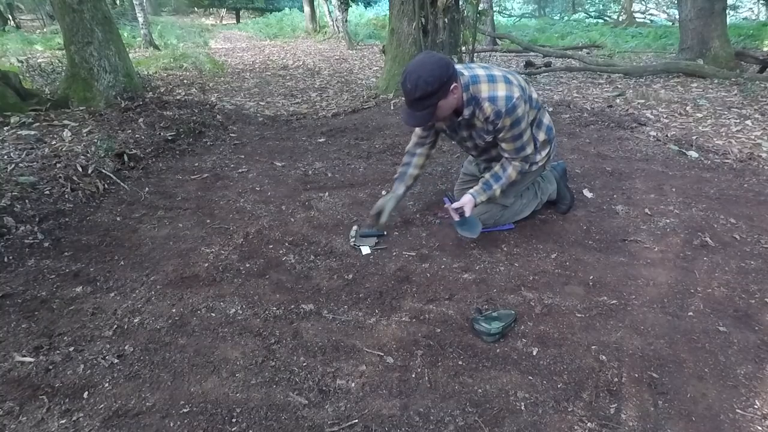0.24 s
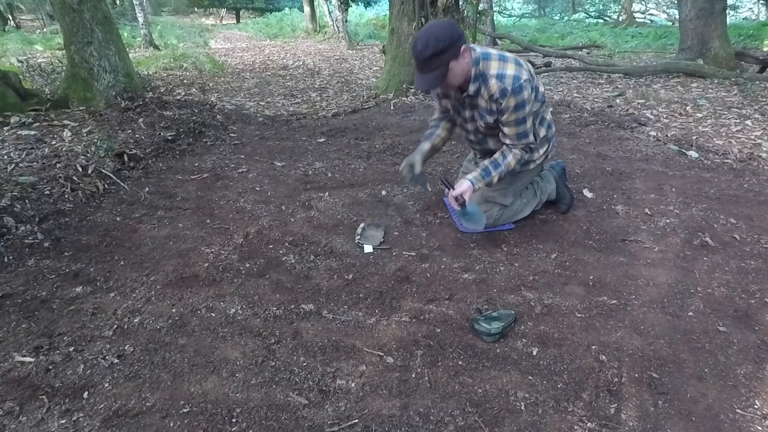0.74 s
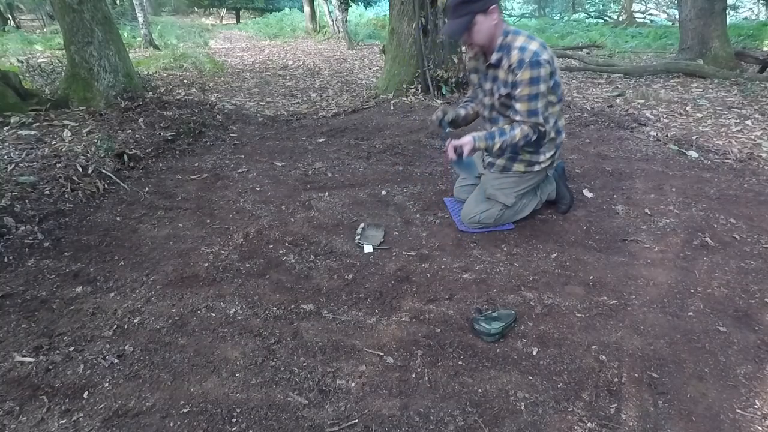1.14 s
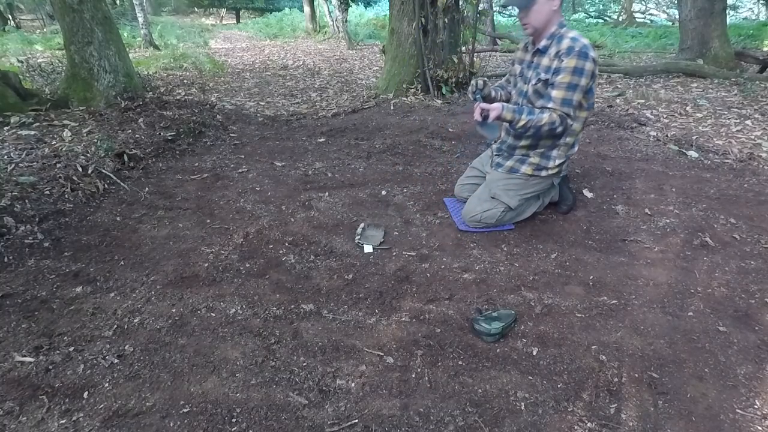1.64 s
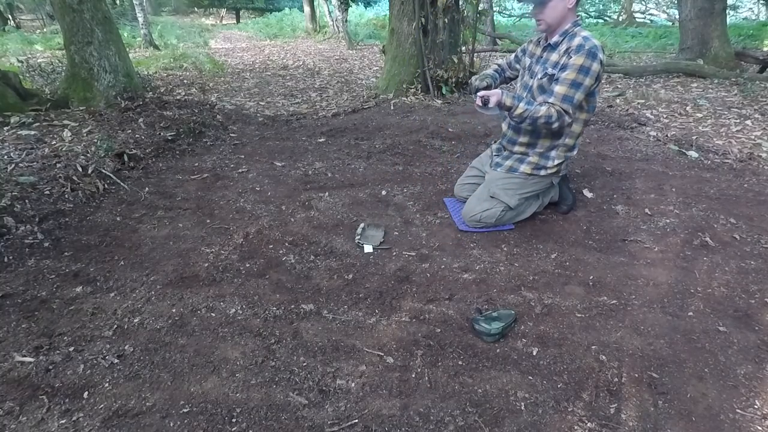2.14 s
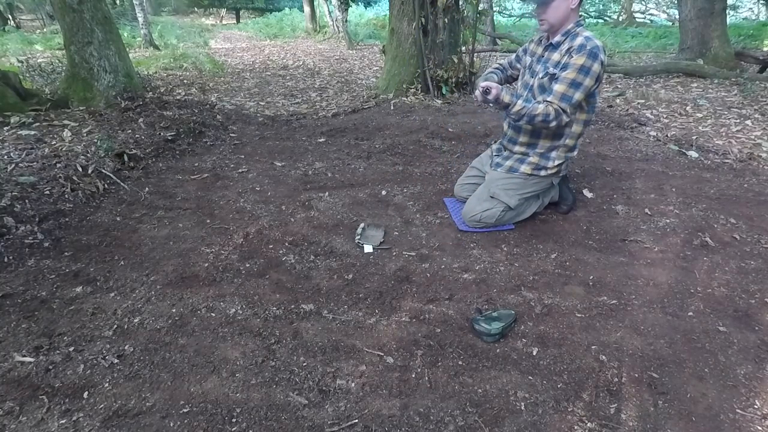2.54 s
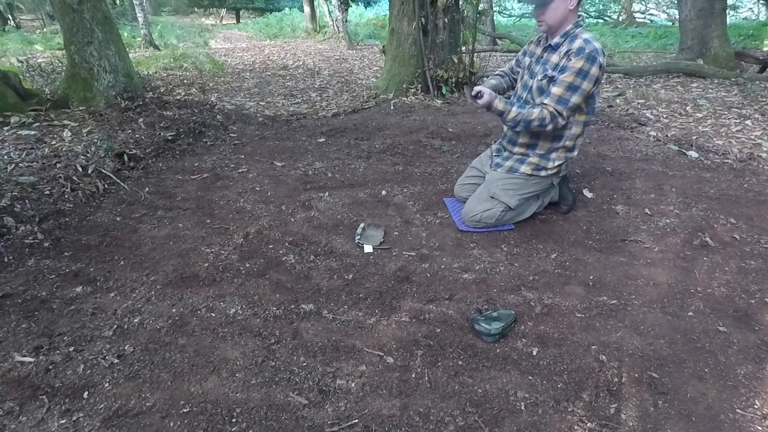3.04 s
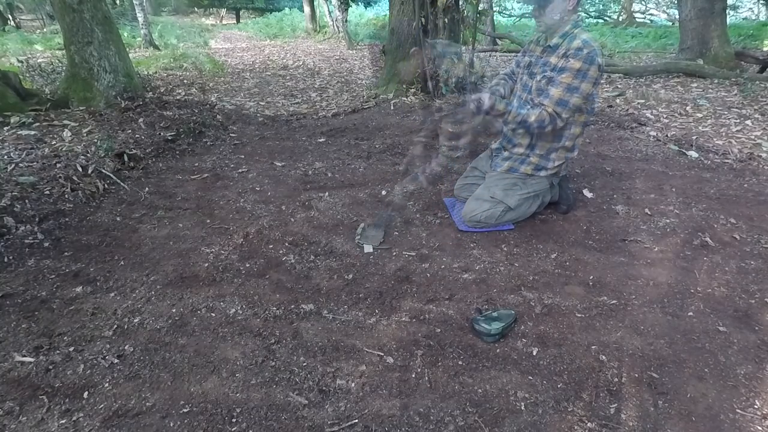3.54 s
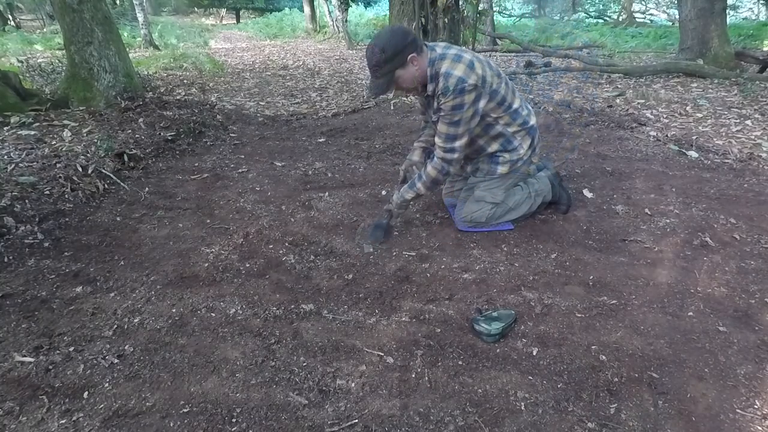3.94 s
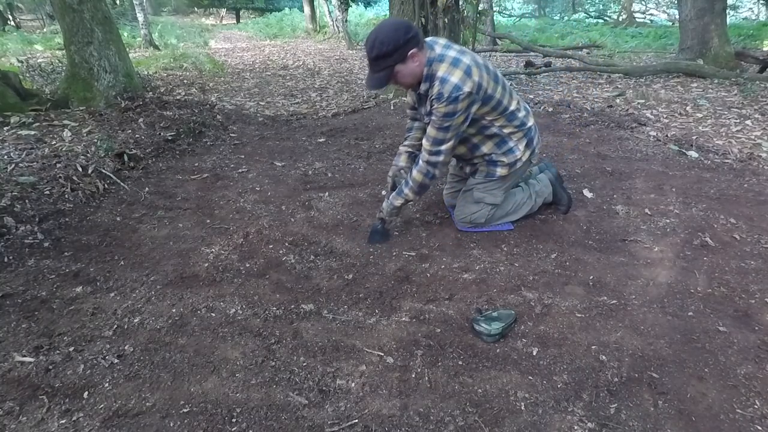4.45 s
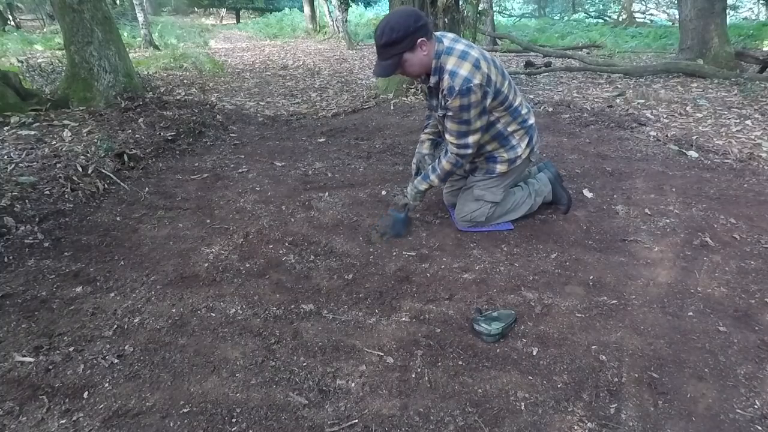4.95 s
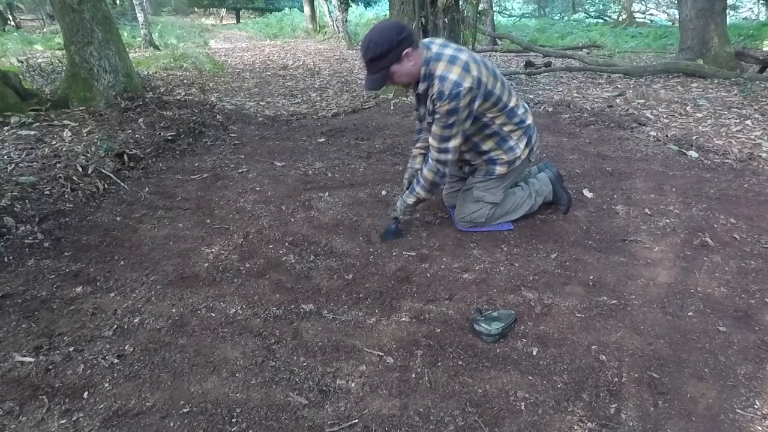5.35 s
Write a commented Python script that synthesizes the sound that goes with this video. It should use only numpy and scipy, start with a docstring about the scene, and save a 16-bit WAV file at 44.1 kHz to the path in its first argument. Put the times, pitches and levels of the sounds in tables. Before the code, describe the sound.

Outdoors on a woodland floor, a few metres from the microphone, a trowel blade gives small bright ticks. A thin steel pan then ticks and clanks, sharpest near one and a half seconds. Blade taps follow, and from about four seconds gritty strokes dig through dry soil and leaf crumbs, with twigs and stones snapping. Low rumble and soft hiss lie beneath, with a faint short echo.

```python
"""On the bare floor of a wood, over a low outdoor rumble and soft hiss, a trowel blade ticks a few metres away.
After a light brush of the litter a small steel pan ticks and clanks: chattering contacts drive its ringing modes.
The blade then taps and is drawn through dry soil and leaf crumbs in gritty strokes made of random breaks.
Later twigs and small stones snap under it, as short noise bursts with a crumbling tail.
From the first tick on, the ground, the kneeling body and the trees return a faint echo of decaying noise."""
import sys
import numpy as np
from scipy import signal
from scipy.fft import rfft, irfft, next_fast_len
from scipy.io import wavfile

SR = 44100
rng = np.random.default_rng(int(sys.argv[2]) if len(sys.argv) > 2 else 0)


def output_pcm(signal):
    """Save a mono or channel-first signal as 16-bit PCM at the path in sys.argv[1].

    Samples are clipped to [-1, 1] before scaling.
    """
    pcm = np.clip(np.atleast_2d(signal).T, -1, 1) * 32767
    wavfile.write(sys.argv[1], SR, np.round(pcm).astype(np.int16))


N = 246519

# Spectrum of the outdoor rumble: (frequency [Hz], relative level [dB])
RUMBLE_SPECTRUM = [(13, -37), (22, -4), (82, 0.5), (99, -1.5), (140, -8), (184, -6.5), (221, -14),
                   (336, -19.5), (420, -29), (550, -56), (920, -120)]
# Swell of the rumble's upper part, before a fixed trim: (time [s], level [dB])
RUMBLE_SWELL = [(0.0, -39.5), (0.15, -41), (0.43, -44.5), (1.2, -36), (1.62, -39.5), (1.82, -36),
                (2.12, -42.5), (3.3, -42.5), (3.38, -44.5), (4.95, -44.5), (5.43, -42.5), (5.59, -42.5)]
# Spectrum of the soft hiss: (frequency [Hz], relative level [dB])
HISS_SPECTRUM = [(180, -10.5), (300, 0), (511, -6), (614, -9), (842, -9), (978, -12), (2440, -15),
                 (2880, -17), (3240, -16.5), (4520, -18), (5430, -19), (14700, -23.5), (16000, -28)]
# Body, mid, upper and top bands of every contact: (low edge [Hz], high edge [Hz])
BANDS_HZ = [(380, 1200), (1200, 3000), (3000, 6500), (6500, 15500)]
# Broad colour of dry contacts: (centre [Hz], width [Hz], boost or dip [dB])
CONTACT_COLOUR = [(1900, 1300, 19), (4060, 4300, 11.5), (8560, 2100, 12), (9800, 1200, -4.5),
                  (13300, 7800, 6)]
# In the event tables level is that of the mid band, before the layer's gain;
# body, brightness and top sparkle are relative to it.
# Taps and short rasps of the blade: (time [s], level [dB], body [dB], brightness [dB], top sparkle [dB],
# contact [s], ring trim [dB], frequency favoured by the struck spot [Hz])
BLADE_TAPS = [(.078, -39, -9, 11.5, 3, 0.0016, 1, 4010), (.332, -42.5, -14, 14, 7, 0.0033, 5, 8395),
              (.34, -39, -17, 5, 2, 0.012, -14, 7730), (.4046, -42, -16, 4, -2, 0.0036, 7, 5658),
              (2.5203, -31.5, -9, 1.5, -3, .0038, -26, 2230), (2.529, -31, -6, 1, -9, 0.0058, 3, 2230),
              (2.5647, -49.5, -17, 11.5, 7, 0.0052, -24, 4320),
              (2.8945, -32.5, -1, -3, -5.5, 0.0092, -17, 2615),
              (2.8999, -30, -11, -1, -25, 0.00044, -13.5, 870),
              (3.0057, -34, -6, -5.5, -8.5, 0.0051, -12, 2615),
              (3.095, -38.5, -14, -4.5, -15, 0.0082, -31, 2615),
              (3.2375, -34, -8, -1, -1.5, 0.0046, -10, 8807), (3.243, -39, -34, -18, -9, 0.0019, 18, 2615),
              (3.297, -44.5, -10, 1, 3.5, 0.0093, -31, 8395), (3.312, -41, -1, 1.5, -10, 0.0035, -9, 3450),
              (3.4407, -43, -13, -8, -21, 0.018, -37, 2230),
              (3.9905, -38.5, -24, -0.5, -2, 0.0036, -42, 2230),
              (5.4195, -27, -6, -2, -7, 0.021, -31, 2615), (5.4415, -30.5, -27, 0, 3, 0.0056, -8, 3450),
              (5.469, -25, -21, -16, -9, 0.0033, -8, 2615), (5.475, -29.5, -15, 3, -3, 0.0037, -7, 6383)]
# Modes of the free blade: (frequency [Hz], strength [dB], undamped t60 [s])
BLADE_MODES = [(870, -5.5, 0.089), (1310, -37, 0.017), (1620, 6.5, 0.049), (1716, -6, 0.19),
               (2070, -42, 0.078), (2230, 12, 0.021), (2615, -7, 0.33), (2720, 6.5, 0.039),
               (3450, 4, 0.0099), (4010, 6, 0.017), (4320, -17, 0.18), (4590, -7, 0.18), (5160, -4, 0.083),
               (5658, -25, 0.18), (5900, -9, 0.11), (6383, -20, 0.25), (7120, 0.5, 0.047), (7730, 5, 0.041),
               (8010, -15, 0.066), (8395, 2.5, 0.056), (8807, -10, 0.21), (9800, 0.5, 0.066)]
# Strokes through the litter, light brushes at first, then digging:
# (start [s], push [s], ease-off [s], peak level [dB], body [dB], brightness [dB])
STROKES = [(.61, 0.057, .05, -55, -10, -4), (2.47, .03, 0.25, -56, -5, -4.5),
           (2.86, 0.022, 0.069, -49.5, -12, -1.5), (3.205, 0.029, .02, -51, -11, 0),
           (3.661, 0.017, 0.06, -54.5, -14, -2.5), (3.86, 0.1, 0.0092, -56, -14, 0.5),
           (4.09, 0.057, 0.12, -50.5, -4.5, -5), (4.194, 0.049, 0.15, -34.5, -7.5, -3),
           (4.428, 0.11, 0.14, -46, -2.5, -2), (4.752, 0.0085, .12, -50.5, -1, 2.5),
           (4.9, .025, 0.038, -55, -7, 1), (5.01, 0.0088, 0.053, -46, -6, -1),
           (5.073, 0.056, 0.12, -29.5, -4, -4.5), (5.3, 0.038, 0.039, -47.5, -1.5, -4.5),
           (5.375, 0.093, 0.044, -39.5, -7.5, -1.5), (5.495, 0.017, 0.15, -48.5, 0.5, 0.5)]
# Knocks on the pan: (time [s], level [dB], body [dB], brightness [dB], top sparkle [dB],
# contact [s], ring trim [dB], frequency favoured by the struck spot [Hz])
PAN_KNOCKS = [(1.0376, -46, 9, 10, 0.5, 0.0023, -9, 2502), (1.047, -38.5, -3, -16, -25, 0.0014, -2, 2502),
              (1.1675, -38, -2.5, -12, -22, 0.0051, -6, 1830),
              (1.217, -45, 0.5, -7, -11, 0.0061, -11, 4640), (1.228, -49, -6, 9, -10, 0.0028, 10, 5740),
              (1.2737, -36.5, .5, -5, -19, 0.0043, -7, 1503),
              (1.443, -29.5, -7.5, -6, -14, 0.0066, -1, 1503), (1.452, -35, -18, 3, -7, 0.0091, -22, 5740),
              (1.459, -17.5, -24, 8.5, 0.5, 0.0074, 0, 6180), (1.469, -21, -24, 4.5, 1, 0.00097, -8, 2502),
              (1.6877, -51.5, 2, 2.5, -4, 0.007, -16, 3892), (1.7695, -50.5, -15, 9, -1, 0.0066, -14, 3195),
              (1.9067, -52, -6, 2.5, -9, .0052, -15, 3765),
              (2.0364, -44.5, -6, -12, -17, 0.0053, -23, 1830),
              (2.0718, -35, -13, -5, -11.5, 0.0056, -13, 1503),
              (2.194, -36, -7, -9.5, -33, 0.0018, -15, 1503)]
# Modes of the free pan: (frequency [Hz], strength [dB], undamped t60 [s])
PAN_MODES = [(620, 2, .15), (1503, 2, .13), (2497, -7, .38), (5740, -1, .17), (1830, -8, .03),
             (1925, -15, .16), (2029, -4, .04), (3195, 0, .045), (3765, -5, .05), (3892, -14, .12),
             (3990, -3, .04), (4640, -8, .07), (5058, -2, .04), (5233, -15, .14), (5930, -10, .12),
             (6040, -21, .25), (6150, -19, .22), (6385, -16, .22), (6972, -5, .1), (7705, -4, .07),
             (8484, -9, .1)]
# Twigs and stones giving way: (time [s], level [dB], body [dB], brightness [dB])
SNAPS = [(3.685, -52.5, -14, 3), (3.749, -52, 6.5, 0.5), (4.0997, -39, -10, 0.5), (4.121, -42, -15, -3),
         (4.1373, -45, -11, 1), (4.1582, -43, -1, -1), (4.207, -35.5, -7, -0.5), (4.225, -28, -2, -20),
         (4.24, -28, -12, -5.5), (4.274, -31, -23, -6), (4.979, -46, -3, 2.5), (5.011, -42.5, 5.5, -8),
         (5.14, -29, 4, -21), (5.1534, -24.5, -1, 4.5), (5.193, -29.5, 2, -28), (5.294, -41, -1.5, -7),
         (5.3003, -40.5, -14, 1), (5.348, -42.5, -2, -2), (5.3687, -38.5, -13, 12.5), (5.378, -35, -5, -16)]

DEEP_DB, DEEP_EDGE_HZ = -44, 51   # the rumble's deepest part stays steady
UPPER_TRIM_DB, HISS_DB = 1.44, -49
TOUCH_S, LIFT_S = 0.021, 0.0069   # the blade meets and leaves the ground
LIGHT_TOUCH_DB = -73   # a blade that barely rests on the litter
STROKE_SWELL, STROKE_SAG = 0.21, 0.44   # share of the dB between light touch and peak that it rises, then falls
STROKE_ROUNDING = 1.32   # above 1 the pressure lingers near its peak
CUTOFF_HZ = 15350


def from_db(db):
    """Decibels to gain."""
    return 10 ** (np.asarray(db) / 20)


def rms_one(x):
    """Scale to rms 1."""
    return x / np.sqrt(np.mean(x ** 2) + 1e-20)


def add(track, s, sound):
    """Mix a sound in at s seconds."""
    start = round(s * SR)
    track[start:start + len(sound)] += sound[:N - start]


def band(x, edges_hz, order=3):
    """Causal band-pass."""
    return signal.sosfilt(signal.butter(order, edges_hz, "band", fs=SR, output="sos"), x + 1e-18)


def steady_noise(spectrum):
    """Noise of a given spectrum, rms 1."""
    hz, db = np.transpose(spectrum)
    size = next_fast_len(N)
    log_hz = np.log(np.fft.rfftfreq(size, 1 / SR) + 1e-3)
    gain = from_db(np.interp(log_hz, np.log(hz), db, left=-200, right=-200))
    return rms_one(irfft(rfft(rng.standard_normal(size)) * gain, size)[:N])


def rumble_part(side):
    """Rumble noise on one side ("low" or "high") of the deep edge, rms 1."""
    split = signal.butter(4, DEEP_EDGE_HZ, side, fs=SR, output="sos")
    return rms_one(signal.sosfilt(split, steady_noise(RUMBLE_SPECTRUM)))


def outdoors():
    """A steady deep rumble, a swelling layer just above it, and a soft hiss, each of shaped noise."""
    time_s, swell_db = np.transpose(RUMBLE_SWELL)
    upper_db = np.interp(np.arange(N) / SR, time_s, swell_db) + UPPER_TRIM_DB
    rumble = from_db(DEEP_DB) * rumble_part("low") + from_db(upper_db) * rumble_part("high")
    return rumble + from_db(HISS_DB) * steady_noise(HISS_SPECTRUM)


def coloured(x):
    """The broad peaks and dips of a dry contact, in series."""
    for hz, width_hz, db in CONTACT_COLOUR:
        w, g = 2 * np.pi * hz / SR, from_db(db / 2)
        a = np.tan(np.pi * width_hz / SR)
        zeros = [1 + a * g, -2 * np.cos(w), 1 - a * g]
        poles = [1 + a / g, -2 * np.cos(w), 1 - a / g]
        x = signal.lfilter(zeros, poles, x)
    return x


def band_gains(level_db, body_db, bright_db, top_db):
    """Gains of the low, mid, upper and top bands; body, brightness and top are relative to the mid band."""
    return [from_db(level_db + db) for db in (body_db, 0, bright_db, top_db)]


def voiced(sound, gains):
    """Hardness and place of a contact set each band's energy in its first 30 ms (as if spread over 10 ms)."""
    head, spread = round(.03 * SR), .01 * SR
    voice = 0
    for gain, edges in zip(gains, BANDS_HZ):
        part = band(sound, edges)
        voice = voice + gain * part * np.sqrt(spread / np.sum(part[:head] ** 2))
    return voice


def ring(force, hz, t60):
    """One mode: a unit click leaves a dying sine of height 1."""
    r, w = from_db(-60 / (t60 * SR)), 2 * np.pi * hz / SR
    return signal.lfilter([0, np.sin(w)], [1, -2 * r * np.cos(w), r * r], force + 1e-18)


def strikes(events, modes, ring_db, spot_db, spot_octaves, release, damping_db):
    """Steel chatters for a few ms and drives the modes, most of all those that swing at the struck spot."""
    out, t = np.zeros(N), np.arange(SR // 2) / SR
    hz, mode_db, t60 = np.transpose(modes)
    for s, level_db, *tone_db, contact_s, own_ring_db, spot_hz in events:
        chatter = rng.standard_normal(len(t)) * from_db(2 * rng.standard_normal(len(t)))
        age = t / max(contact_s, 1e-4)
        envelope = (1 - np.exp(-12 * age)) * np.exp(-age ** release)   # a long rasp also starts more softly
        chatter = coloured(chatter * envelope)

        favoured = np.exp(-(np.log2(hz / spot_hz) / spot_octaves) ** 2)
        strength_db = mode_db + spot_db * favoured + rng.standard_normal(len(hz))
        strengths = from_db(strength_db) * np.sqrt(t60)
        # a heavy blow presses the parts together and chokes the ring
        lives = t60 / (1 + from_db(level_db - damping_db))
        steel = sum(g * rms_one(ring(chatter, f, life)) for g, f, life in zip(strengths, hz, lives))

        contact = rms_one(chatter) + from_db(ring_db + own_ring_db) * rms_one(steel)
        add(out, s, voiced(contact, band_gains(level_db, *tone_db)))
    return out


def blade_taps():
    """Taps and short rasps of the trowel blade, ringing in its own modes."""
    return strikes(BLADE_TAPS, BLADE_MODES, ring_db=7.0, spot_db=17.5, spot_octaves=0.035,
                   release=0.99, damping_db=-24)


def wood_echo(x, t60, top_hz, near_t60, near_db):
    """Ground and kneeling body scatter the sound within ms; the trunks send back a thin, duller tail."""
    t = np.arange(SR) / SR
    trunks = from_db(-60 * t / t60)
    near = from_db(near_db - 60 * t / near_t60)
    tail = rng.standard_normal(SR) * (trunks + near) * (t > .004)
    echoes = band(tail, [500, top_hz], order=2)
    return signal.fftconvolve(x, echoes / np.sqrt(np.sum(echoes ** 2)))[:N]


def drift(rate):
    """Smooth chance with spread 1 and about `rate` turns a second."""
    knots = rng.standard_normal(8192)
    return rms_one(np.interp(np.arange(N) / SR * rate, np.arange(len(knots)), knots))


def breaks(per_s, size_db):
    """Random clicks, scaled to be equally strong on average at any rate; size_db sets how sizes vary."""
    sizes = from_db(size_db * np.minimum(rng.exponential(1, N), 3)) * rng.choice([-1, 1], N)
    happens = rng.random(N) < per_s / SR
    return rms_one(happens * sizes / np.sqrt(per_s))


def crumbs(per_s, count=42):
    """Coarse bits of leaf and grit tick at own pitches; alike bits lie in clumps, so each pitch comes and goes."""
    cycles, clumps_per_s, clump_db = 30, 28, 3.8   # a tick's t60 lasts this many cycles
    clicks, dealt = breaks(per_s, size_db=6.5), rng.integers(0, count, N)
    ticks = np.zeros(N)
    for k, hz in enumerate(np.geomspace(430, 13000, count)):
        clumping = from_db(clump_db * drift(clumps_per_s))
        ticks += ring(clicks * (dealt == k), hz, cycles / hz) * np.sqrt(hz) * clumping
    return rms_one(coloured(ticks))


def stroke_gains(top_db, top_follows):
    """Band gains as strokes touch down, swell, sag and lift off: light brushes stay even, hard digs peak."""
    power, t = np.zeros((len(BANDS_HZ), N)), np.arange(N) / SR
    for start, push_s, ease_s, peak_db, body_db, bright_db in STROKES:
        peak, end = start + push_s, start + push_s + ease_s
        slack = np.interp(t, [start, peak, end], [1, 0, 1]) ** STROKE_ROUNDING
        slack = slack * np.where(t < peak, STROKE_SWELL, STROKE_SAG)
        pressure = from_db(slack * (LIGHT_TOUCH_DB - peak_db))
        touching = np.interp(t, [start - TOUCH_S, start, end, end + LIFT_S], [0, 1, 1, 0])
        # the top follows the brightness
        gains = band_gains(peak_db, body_db, bright_db, top_db + top_follows * bright_db)
        power += np.outer(gains, pressure * touching) ** 2
    return np.sqrt(power)


def scrape(grains_per_s, crumbs_per_s, slip_rate, slip_db, blade_db, thud_db, cracks_per_s, crack_db):
    """Soil breaks in clumps as the blade sticks and slips; harder strokes break more, and the steel rings faintly."""
    gains = stroke_gains(top_db=-1.5, top_follows=1.0)
    force = gains[1]
    effort = (force / force.max() + .02) ** .25
    slipping = from_db(slip_db * drift(slip_rate))
    fine = rms_one(coloured(breaks(grains_per_s * effort, size_db=-4.0) * slipping))
    coarse = rms_one(crumbs(crumbs_per_s * effort) * slipping)

    steel = np.zeros(N)
    for hz, db, t60 in BLADE_MODES:
        steel += from_db(db + 2 * drift(4.5)) * ring(fine, hz, t60 / 2)   # soil damps the blade

    cracks = rms_one(coloured(breaks(cracks_per_s * effort, size_db=0.0)))   # whole dry leaves split
    sound = fine + coarse + from_db(crack_db) * cracks + from_db(blade_db) * rms_one(steel)
    # the packed earth gives a little
    thud = force * from_db(thud_db) * rms_one(band(fine, [170, 400], order=2))
    return thud + sum(gain * rms_one(band(sound, edges)) for gain, edges in zip(gains, BANDS_HZ))


def pan_knocks():
    """Ticks and clanks of the small steel pan, ringing in its own modes."""
    return strikes(PAN_KNOCKS, PAN_MODES, ring_db=2.5, spot_db=11, spot_octaves=.025,
                   release=1.4, damping_db=-23)


def snaps(crack_s, crumble_s, crumble_db, top_db, top_follows):
    """Twigs and stones: a brittle crack, decaying well within a millisecond, trailed by crumbs."""
    out, t = np.zeros(N), np.arange(SR // 20) / SR
    for s, level_db, body_db, bright_db in SNAPS:
        # the top follows the brightness
        gains = band_gains(level_db, body_db, bright_db, top_db + top_follows * bright_db)
        shape = np.exp(-t / crack_s) + from_db(crumble_db) * np.exp(-t / crumble_s)
        add(out, s, voiced(coloured(shape * rng.standard_normal(len(t))), gains))
    return out


def scene():
    """Handling and digging among the trees, over rumble and hiss."""
    air = outdoors()
    blade = from_db(0.73) * blade_taps()
    soil = from_db(3.3) * scrape(grains_per_s=14000, crumbs_per_s=4600, slip_rate=170, slip_db=1.8,
                                 blade_db=-12, thud_db=-10.0, cracks_per_s=260, crack_db=-11.5)
    pan = from_db(-.3) * pan_knocks()
    twigs = from_db(-1.5) * snaps(crack_s=0.00025, crumble_s=0.0081, crumble_db=-21.5,
                                  top_db=-2.5, top_follows=0.29)
    work = blade + soil + pan + twigs
    echo = from_db(-17.0) * wood_echo(work, t60=0.74, top_hz=8750, near_t60=0.065, near_db=25.5)
    return (work + echo + air)[None]


def record(dry, ceiling=0.49):
    """At the microphone the highest peaks are rounded and the top is cut."""
    top_cut = signal.ellip(10, .3, 80, CUTOFF_HZ, fs=SR, output="sos")
    return signal.sosfilt(top_cut, ceiling * np.tanh(dry / ceiling))


dry = scene()
out = record(dry)
output_pcm(out)
```